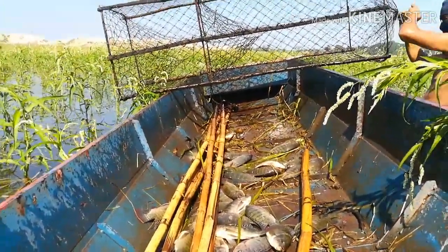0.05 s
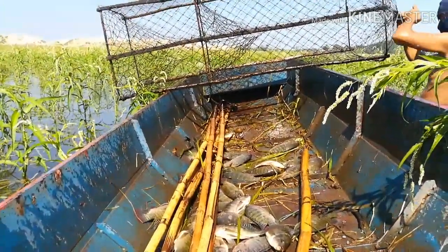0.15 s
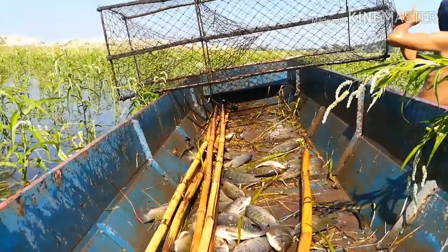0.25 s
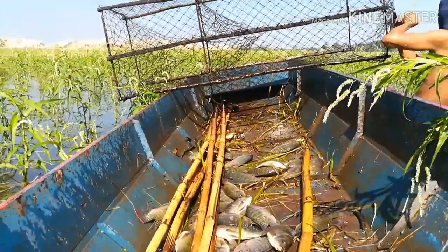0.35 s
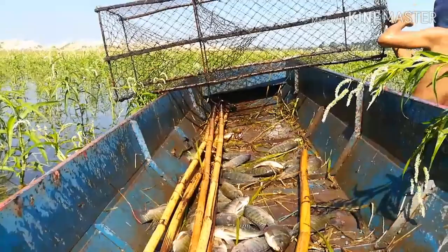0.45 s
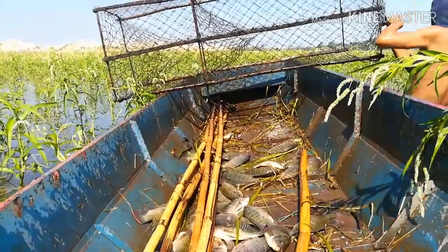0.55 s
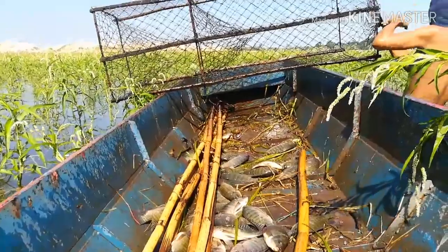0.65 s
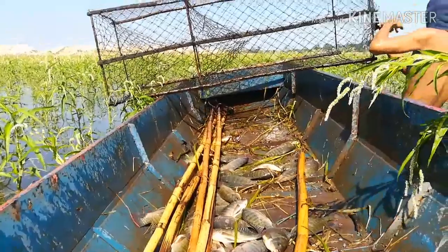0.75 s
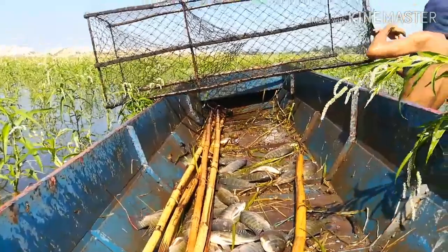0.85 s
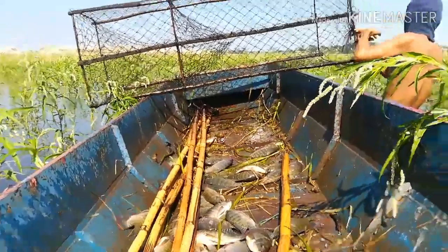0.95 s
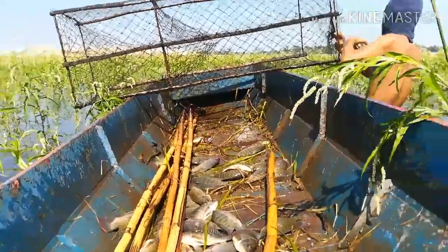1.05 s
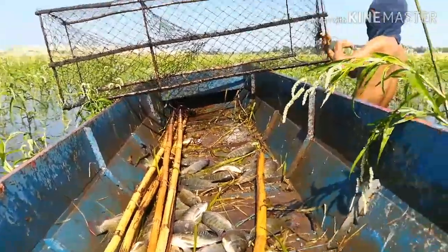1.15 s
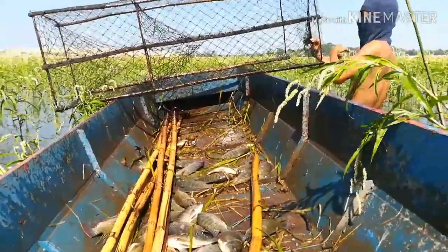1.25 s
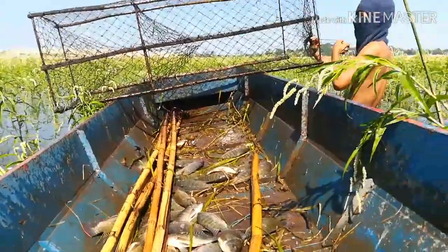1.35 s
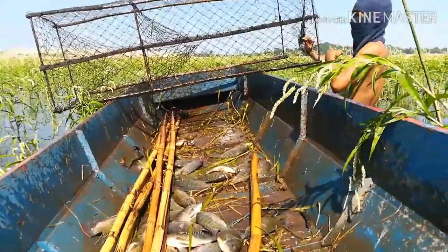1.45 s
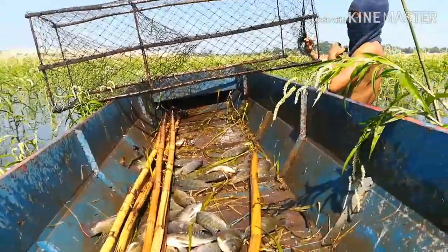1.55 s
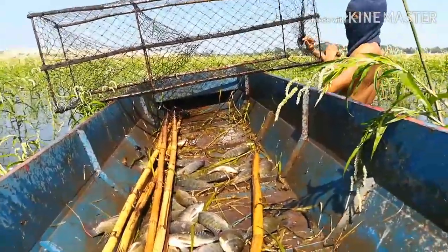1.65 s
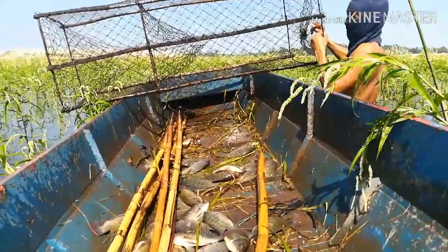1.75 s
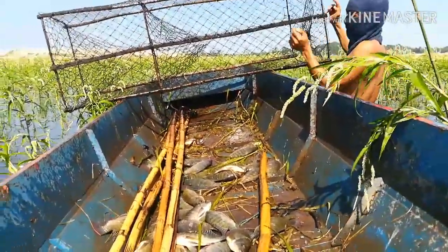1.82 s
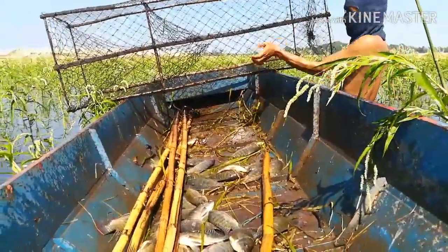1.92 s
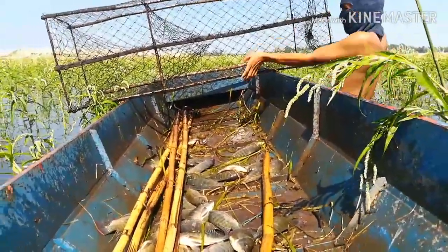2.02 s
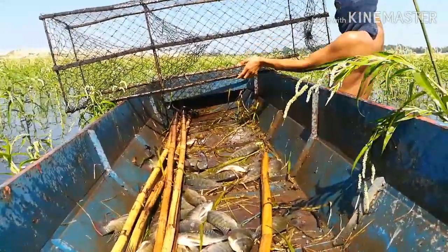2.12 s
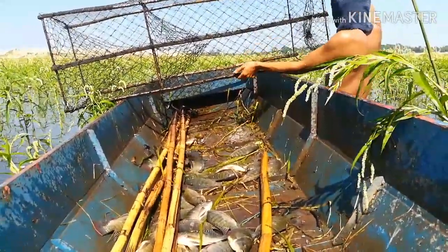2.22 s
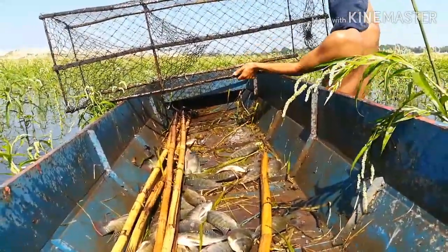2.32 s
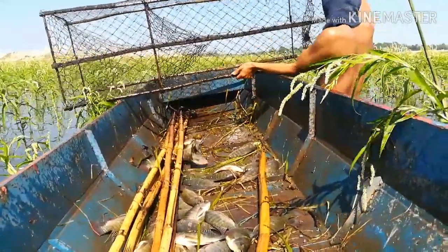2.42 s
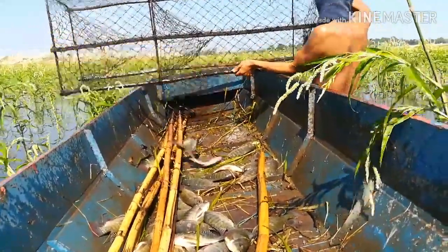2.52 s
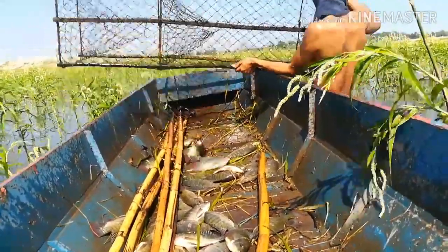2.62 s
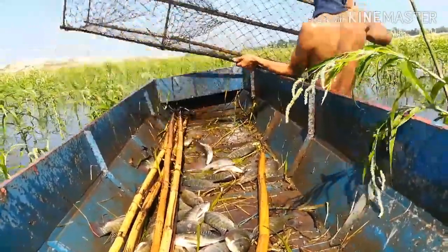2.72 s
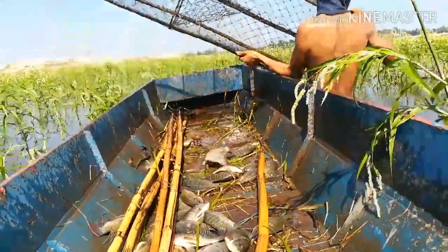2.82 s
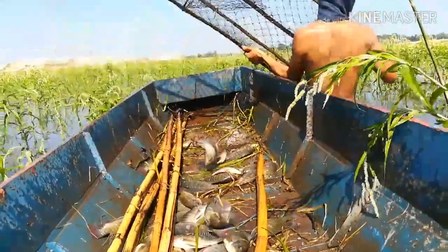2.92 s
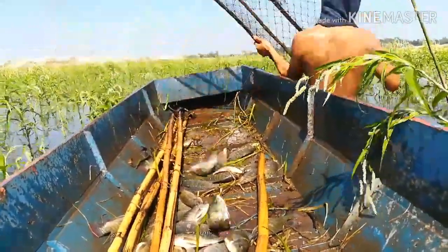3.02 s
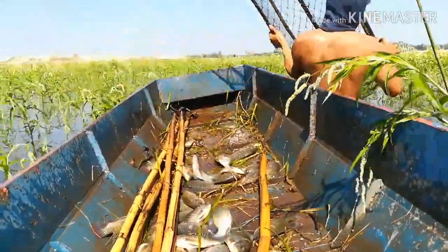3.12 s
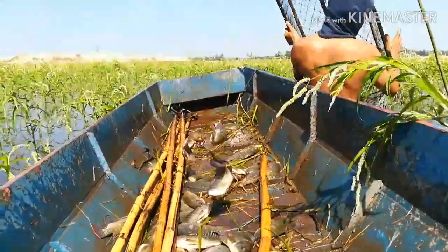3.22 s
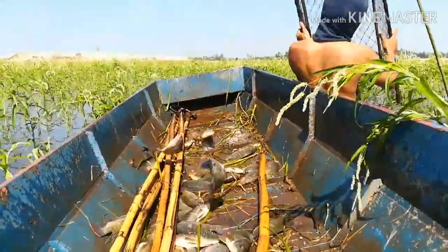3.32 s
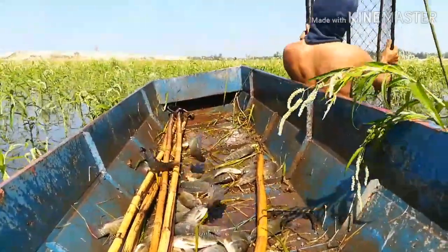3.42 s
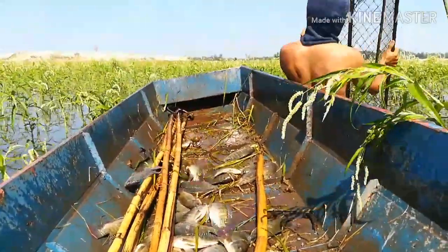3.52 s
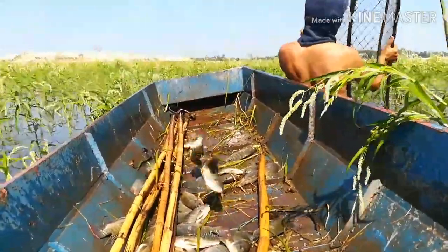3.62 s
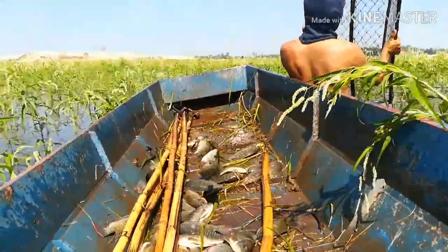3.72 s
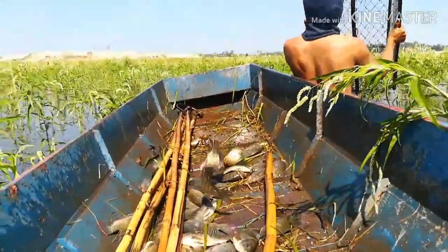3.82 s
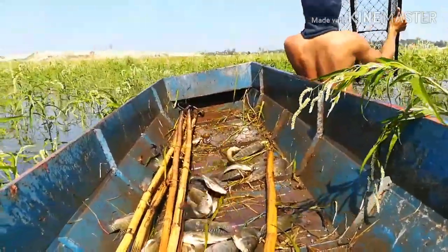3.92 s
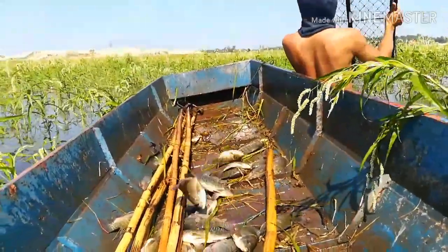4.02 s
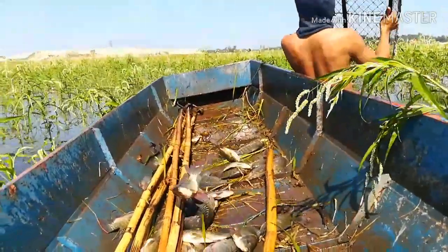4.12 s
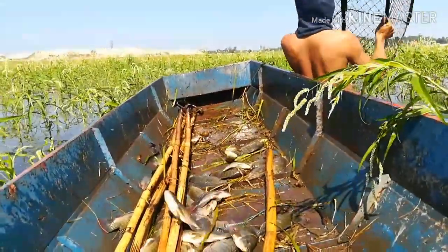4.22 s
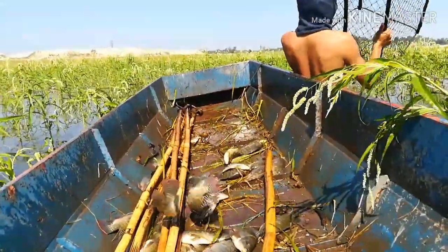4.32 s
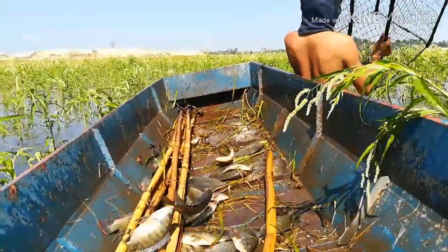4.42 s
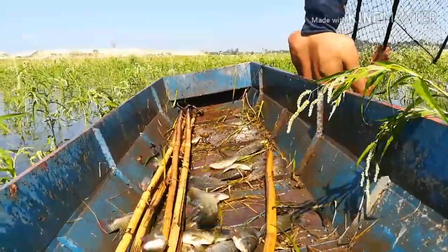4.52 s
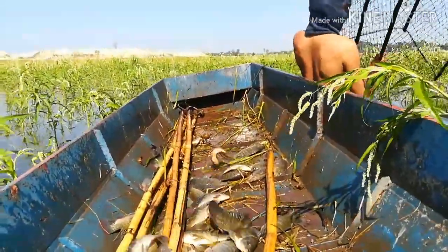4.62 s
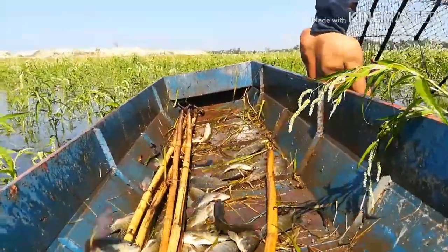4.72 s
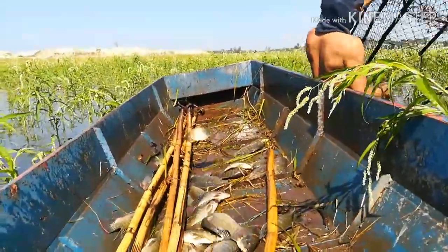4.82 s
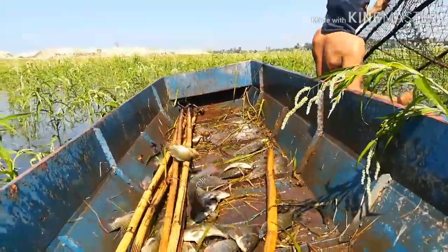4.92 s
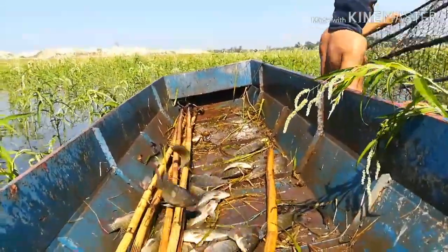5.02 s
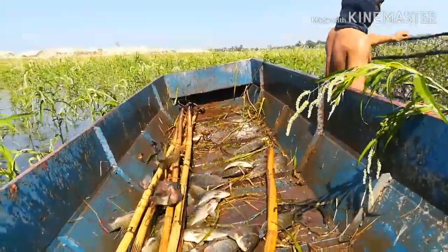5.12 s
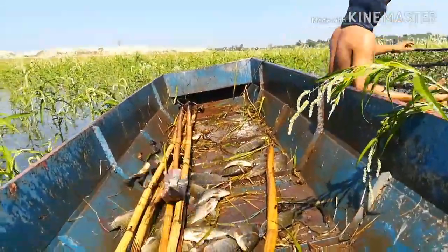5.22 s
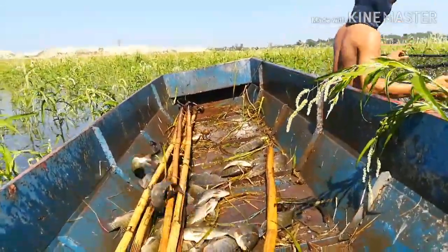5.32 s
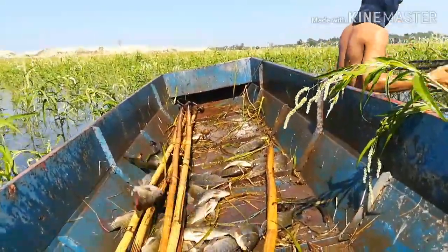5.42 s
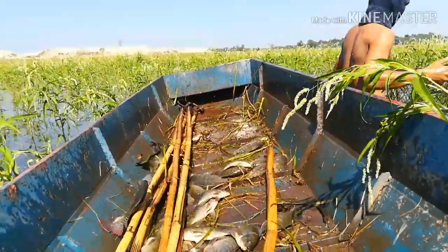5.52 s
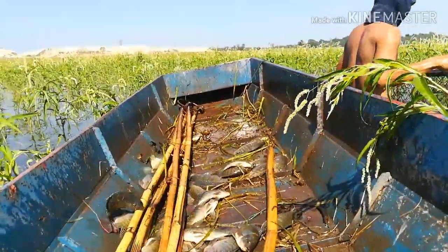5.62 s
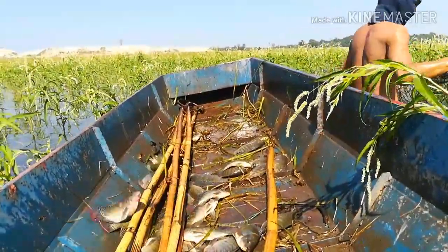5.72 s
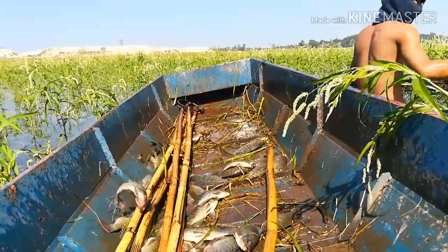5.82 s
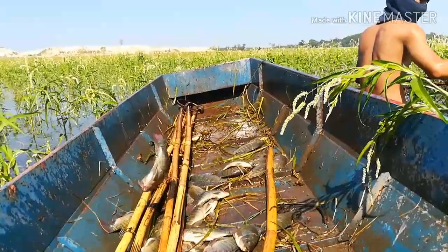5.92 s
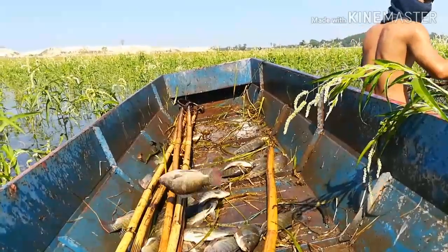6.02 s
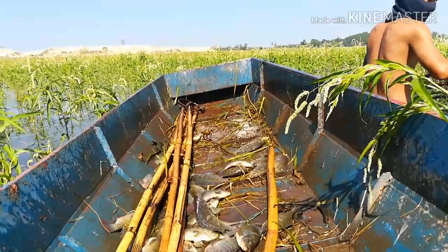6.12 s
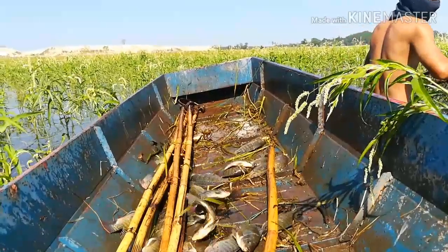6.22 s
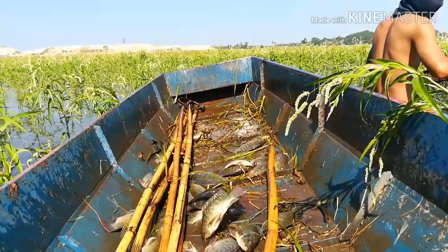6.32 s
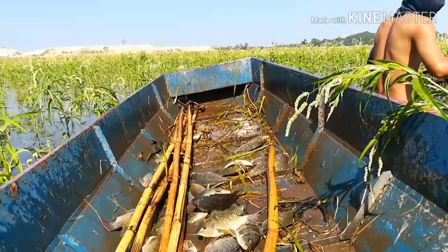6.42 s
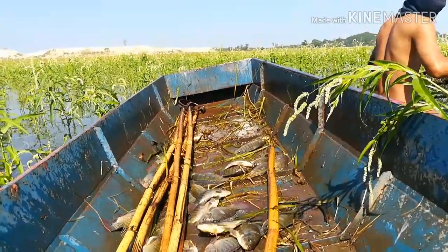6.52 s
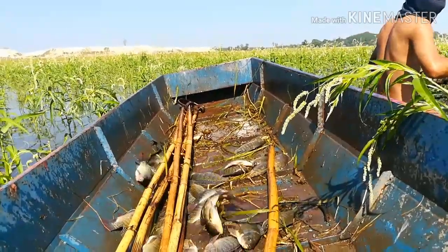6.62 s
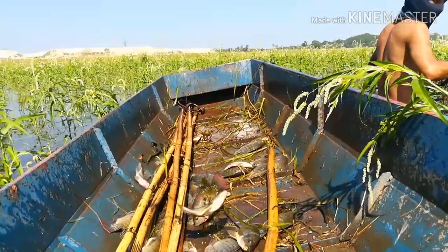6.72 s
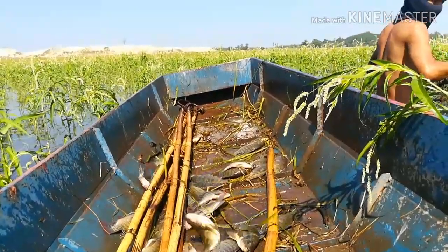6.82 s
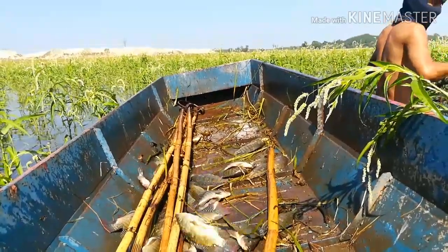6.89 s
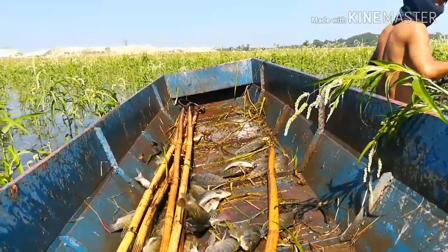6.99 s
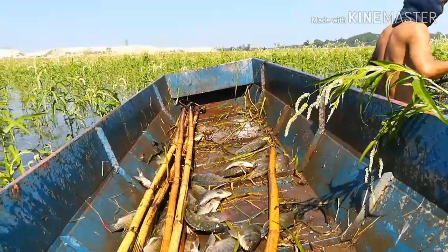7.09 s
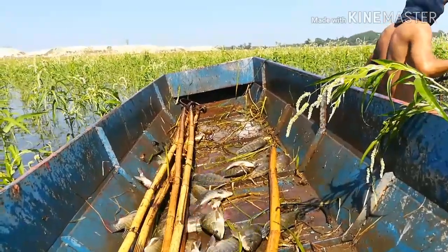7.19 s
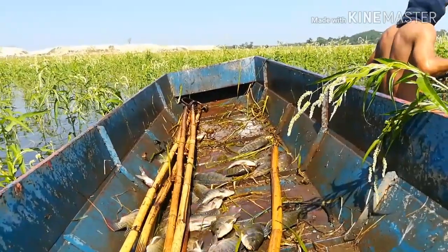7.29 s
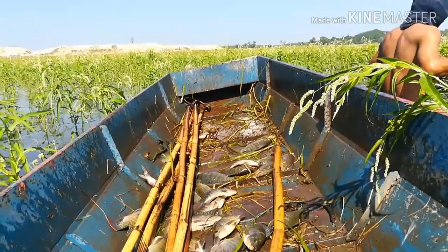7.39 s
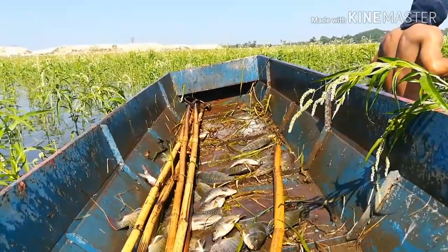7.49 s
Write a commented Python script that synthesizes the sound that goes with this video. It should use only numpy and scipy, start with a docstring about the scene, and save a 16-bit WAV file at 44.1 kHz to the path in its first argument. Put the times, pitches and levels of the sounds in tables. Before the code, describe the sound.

Quiet netting scrapes and a low hull growl give way to irregular wet flopping, hollow metal thuds, clatter, droplets and one sharp crack.

```python
"""On the wet floor of a steel boat in a reed marsh, live fish flop while a wire trap goes over the bow into water.
Slaps, smacks, ticks and rustle are shaped noise with abruptly varying strength or short fades.
Thuds, bamboo poles, wire and the frame's plunge excite decaying modes; drips and spatter are decaying sines.
The boat growls and rumbles as it is shaken, over still open air; steel walls add short echoes to many sounds."""
import sys
import numpy as np
from scipy import signal
from scipy.fft import rfft, irfft, next_fast_len
from scipy.io import wavfile
from scipy.ndimage import uniform_filter1d

SR = 44100
rng = np.random.default_rng(int(sys.argv[2]) if len(sys.argv) > 2 else 0)


def generate_wav(signal):
    """Clip the signal to [-1, 1] and save it as 16-bit WAV at the path in sys.argv[1]."""
    frames = np.transpose(np.atleast_2d(signal))
    scaled = np.clip(frames, -1, 1) * 32767
    pcm = np.round(scaled).astype(np.int16)
    wavfile.write(sys.argv[1], SR, pcm)


N = 332955
TIME = np.arange(N) / SR

# Event levels are those at the source, ahead of any gain, floor colour, wall echo or port colour.
# Wet tail slaps: start_s, level_db, centre_hz, decay_ms (at least 1 ms is used)
SLAPS = [(0.37, -65, 2850, 2.1), (0.529, -60.5, 4970, 23), (2.118, -53.5, 3180, 4),
         (2.343, -48.5, 4430, 7.1), (2.357, -43.5, 2120, 27), (2.386, -48, 4500, 8),
         (2.438, -41, 3870, 3.3), (2.484, -52, 7500, 4), (2.516, -49, 6700, 6.8), (2.545, -35.5, 4020, 3.1),
         (2.667, -42, 3800, 5), (2.848, -46, 2100, 18), (3.036, -39.5, 5040, 4.2), (3.068, -36.5, 4800, 14),
         (3.1, -31, 4000, 8.6), (3.13, -38.5, 5030, 10), (3.222, -37.5, 5570, 8.6), (3.383, -40, 12000, 35),
         (3.865, -38.5, 3180, 23), (3.921, -40.5, 5000, 5), (3.94, -37.5, 5000, 4),
         (4.133, -46.5, 5100, 4.3), (4.184, -45.5, 4630, 6.1), (4.245, -30, 3800, 5.5),
         (4.254, -31.5, 3770, 7), (4.275, -29.5, 3600, 7.1), (4.433, -40.5, 3830, 2),
         (4.462, -34, 5500, 2.2), (4.552, -33.5, 3880, 24.4), (4.8, -33, 6000, 1.6),
         (4.841, -34.5, 3900, 0.82), (4.867, -32.5, 3030, 15), (4.948, -33.5, 3330, 6.8),
         (5.027, -31, 5300, 29), (5.158, -32, 3900, 32), (5.515, -40.5, 3720, 41), (5.726, -41.5, 3640, 15),
         (6.112, -35, 3850, 2.6), (6.172, -39, 5670, 2.4), (6.183, -42, 5640, 2.9), (6.535, -30, 4240, 3.9),
         (6.613, -43, 3350, 5), (6.78, -45.5, 3300, 0.9), (6.809, -28.5, 5500, 8.1),
         (6.862, -30, 2540, 12.7), (6.911, -38, 2520, 13), (6.986, -37, 3240, 12), (7.136, -48, 2550, 5.3),
         (7.158, -46, 2600, 3.2)]
# Whole flanks smacking down flat: start_s, level_db, ring_pitch_ratio
SMACKS = [(3.448, -26, 0.95), (3.49, -26, 0.74), (3.544, -28.5, 1.02)]
# Air gap under a flank, before the pitch ratio: pitch_hz, level_db, t60_s
SMACK_MODES = [(1370, -6, .014), (5020, 3, .008), (6380, 4, 0.01), (7200, 7, .008)]
# Spectrum of a flat smack: frequency_hz, level_db
SMACK_COLOUR = [(700, -21), (1200, -5), (2300, -3), (3800, -2.5), (6000, 2), (9500, 2.5), (11000, 1.5),
                (15500, -8)]
# Wet floor's colour on slaps and clatter: frequency_hz, level_db
FLOOR_COLOUR = [(650, 2), (1300, 1), (1750, 1.5), (2450, -2), (3800, 0.5), (6000, -1), (12000, -2)]
# Lone flicks of a fin: start_s, peak_db, centre_hz
TICKS = [(3.995, -33.5, 3930), (4.368, -37, 5500), (4.409, -33, 5500), (5.96, -46, 11940),
         (6.0, -48.5, 12900), (6.044, -44.5, 11940), (6.472, -32.5, 5840), (6.743, -35, 5200),
         (7.046, -24.5, 4500)]
# Flops that throw up water: start_s, droplet_level_db
SPATTERS = [(2.39, -44), (4.271, -25), (4.95, -34), (5.17, -30), (5.31, -33.5), (5.76, -39.5),
            (6.871, -24.5), (6.995, -32)]
# Bouts of wriggling that stir netting, stalks and wet scales: start_s, length_s, level_db
WRIGGLES = [(2.37, 0.33, -60.5), (3.01, 0.13, -49.5), (3.437, 0.16, -48.5), (3.87, 0.092, -47),
            (4.05, 0.22, -57), (4.43, 0.16, -47), (5.73, 0.071, -51), (6.095, 0.1, -49.5),
            (6.47, 0.06, -58), (6.55, 0.071, -45), (6.85, 0.26, -58), (7.14, 0.18, -62)]
WRIGGLE_ATTACK_S, WRIGGLE_RELEASE_S = 0.0069, 0.014
# Low, lasting stir of the disturbed catch: start_s, length_s, level_db
FIDGET = [(2.08, 5.22, -68.5)]
# Spectrum of netting and wet stalks: frequency_hz, level_db
RUSTLE_COLOUR = [(500, -7.5), (900, 0), (1300, 2), (1950, -3.5), (2600, -2), (3600, -4.5), (5200, -1.5),
                 (7200, -8.5), (11000, -11), (15000, -14)]
# Blows on the hull, soft bodies being dull: start_s, level_db, brightest_ring_hz
THUDS = [(0.529, -50.5, 609), (1.02, -49, 495), (2.089, -56, 257.3), (2.356, -40.5, 319.5),
         (2.384, -33, 279.4), (2.842, -52.5, 259), (3.101, -28, 500), (3.193, -36.5, 250),
         (3.447, -31, 328.6), (3.49, -35, 336), (3.615, -43, 200), (3.919, -40, 241), (4.219, -32, 418),
         (4.26, -33.5, 741), (4.39, -47, 215), (4.56, -37, 285), (4.805, -26.5, 390), (4.89, -34, 424),
         (5.149, -39.5, 591), (5.269, -39.5, 297), (5.59, -42.5, 355), (5.746, -38.5, 458),
         (6.113, -44.5, 229), (6.177, -41.5, 226), (6.54, -35.5, 258), (6.611, -40, 244.6),
         (6.863, -34.5, 522), (6.987, -33.5, 627), (7.148, -42.5, 354)]
# The steel hull's clearest modes: pitch_hz, level_db, t60_s
HULL_MODES = [(60, -8.5, 4), (87.9, 1.5, 1.9), (140, 3, 1.2), (166.3, -2, 1.7), (178.9, 2.5, 0.65),
              (213.8, 0.5, 1), (226.4, 2.5, 0.8), (295, -11.5, 0.34), (367.2, -4, .7), (546, -4.5, .3),
              (661, -7.5, 0.57), (852, -5.5, 0.7), (912, -6.5, 0.46)]
# The hull's crowd of weaker modes: frequency_hz, level_db (per half octave), t60_s
HULL_WASH = [(39.54, -23, 1.3), (59.4, -17.5, 1.6), (101.3, -2, 1.3), (163, -0.5, 1.2), (252, 2, 0.84),
             (310, -2, 0.62), (480, -2, 0.64), (1001, 7.5, 0.26), (2405, -6.5, .25)]
# Poles and bodies clattering on the floor plates: start_s, level_db, decay_ms (at least 1 ms is used)
CLATTERS = [(.875, -53, 19), (2.39, -46.5, 57), (2.668, -44.5, 5.8), (3.102, -39.5, 18), (3.214, -47, 9.7),
            (3.492, -32, 6), (3.51, -47.5, 55), (3.861, -47, 18), (4.248, -31, 14), (4.278, -31.5, 32.3),
            (4.461, -47, 57), (4.553, -47, 46), (4.885, -36.5, 31), (4.939, -36, 17), (5.311, -33.5, 5),
            (5.589, -39.5, 17), (5.74, -44.5, 26), (5.795, -50.5, 51), (6.233, -49.5, 5.7),
            (6.275, -59.5, 19), (6.537, -43, 13), (6.78, -40, 6), (6.86, -37.5, 20), (6.91, -41.5, 52),
            (6.984, -30, 18), (7.03, -40, 26), (7.158, -44.5, 22)]
CLATTER_HZ, CLATTER_DULLING = 1460, 0.12  # centre of a 10 ms clatter; octaves lower per doubled length
# Bamboo on steel: pitch_hz, level_db, t60_s
POLE_MODES = [(628, 10, 0.048), (925, 8.5, 0.041), (1093, 5, 0.01), (1547, -4.5, 0.042), (1663, -1.5, 0.03)]
# One hard crack close by and its rebound: start_s, level_db
CRACKS = [(4.2151, -7.5), (4.221, -22.5)]
# Spectrum of the crack: frequency_hz, level_db
CRACK_COLOUR = [(800, -37), (1130, -7), (1400, -18), (2400, -13.5), (3650, -1), (5500, 2), (6600, -17),
                (9200, -16), (15000, -21.5)]
# Pulls that drag the trap's frame over the bow and down the side: start_s, length_s, level_db
PULLS = [(.295, 0.088, -49), (.53, 0.49, -46), (1.03, 0.079, -43), (1.15, 0.14, -50), (2.7, 0.45, -48),
         (3.66, 0.62, -48)]
PULL_ATTACK_S, PULL_RELEASE_S = 0.02, 0.062
# Spectrum of the dragging growl: frequency_hz, level_db
DRAG_COLOUR = [(40, -4), (90, -3), (180, 2.5), (280, -1.5), (400, -12.5), (620, -18.5), (1100, -24),
               (2100, -34), (3000, -38.5), (6000, -47.5)]
# Knots that slip as the trap's netting stretches: start_s, level_db, decay_ms (at least 1 ms is used)
SLIPS = [(.853, -48, 5.1), (.878, -54, 14), (.894, -48.5, 6.9), (.915, -47, 5), (.926, -47, 4),
         (.957, -38.5, 7.4), (.984, -40, 3.4), (1.025, -49, 21), (1.055, -41, 7.7), (1.084, -55, 8),
         (1.157, -50.5, 6), (1.171, -51.5, 5.6), (1.234, -58, 14), (1.262, -58, 18)]
# Netting wire, before each slip's random tension: pitch_hz, level_db, t60_s
WIRE_MODES = [(2036, 2.5, 0.025), (5220, 3, 0.014)]
# Spectrum of a slipping knot: frequency_hz, level_db
NET_COLOUR = [(700, -15), (1300, 0.5), (2000, -4.5), (3200, 0), (5400, 2), (9500, 0), (15000, -8.5)]
BUMP_S, BUMP_DB, BUMP_LENGTH_S = 1.745, -54, 0.042  # the trap's frame rubs briefly on the bow
# The rubbed frame: pitch_hz, level_db, t60_s
BUMP_MODES = [(240, 3, 0.17), (261, -2, 0.24), (326, -12, 0.86), (980, -15, 0.17)]
ENTRY_S, PLUNGE_S, ENTRY_ATTACK_S = 4.86, 5.16, 0.022  # mesh meets water, then the frame plunges under
MESH_DB, MESH_FALL_DB_PER_S = -34.5, 51  # the netting's rustle dies away as it sinks
SPLASH_DB, SPLASH_RISE_DB_PER_S, SPLASH_FALL_DB_PER_S = -33.5, 67, 45
# Spectrum of the droplet fizz: frequency_hz, level_db
SPLASH_COLOUR = [(210, -22), (350, -6), (639, -13.5), (951, -6), (1150, -11), (1440, -9), (2040, -19.5),
                 (2420, -15.5), (5800, -18), (15500, -29)]
GULP_DB, GULP_LAG_S, GULP_WIDTH_S = -29.5, 0.0055, 0.011
# Hollow gulp of the plunge: pitch_hz, level_db, t60_s
GULP_MODES = [(550, 2.5, 0.082), (764, 5.5, 0.029), (886, -3, 0.12), (940, -2.5, 0.07), (1272, -7.5, 0.14),
              (1481, -1, 0.066), (2406, -6, 0.087)]
# Single drips and popping air pockets: start_s, peak_db, starting_pitch_hz
DRIPS = [(1.5688, -49, 1430), (2.007, -64, 1350), (2.404, -41, 1640), (2.463, -45, 1700),
         (2.507, -46, 1630), (2.668, -40, 1640), (3.491, -30.5, 1145), (4.269, -23, 1870),
         (5.842, -43.5, 1700), (5.883, -48, 1710), (6.202, -46, 1490), (6.234, -42, 1180),
         (6.279, -55, 1100), (6.297, -55, 1700), (6.86, -22, 1530), (6.989, -24, 1310),
         (7.292, -40.5, 2640)]
ROCK_DB, ROCK_POWER, ROCK_SMOOTH_S = -54, 0.75, 0.32  # rumble level, its growth with shaking, averaging time
# Spectrum of the open air: frequency_hz, level_db
AIR_COLOUR = [(12, -35.5), (20, -5), (44, -6.5), (146, -10), (678, -28.5), (1220, -28.5), (2020, -33),
              (16000, -37.5)]
AIR_DB = -67.5
# Unequal treble of the two microphone ports: frequency_hz, left_minus_right_db
PORTS = [(200, 0), (700, 3.5), (2000, 2.5), (3000, 5.5), (5500, 6.5), (7500, -1), (10000, -6), (15000, -10)]
TOP_HZ = 15900


def slaps(spread_db=3, width=1.84, ripple_db=3.5, rise_s=0.00072,
          swish_db=-18, swish_s=0.01, spray_db=-23, spray_s=0.013):
    """Broadband impact: a wet tail swishes down, peels on to the floor in tiny clicks and leaves a little spray."""
    out, lead = np.zeros((2, N)), SR // 50  # room for the swish before contact
    t = TIME[:SR // 8] - lead / SR
    after = np.maximum(t, 0)
    for s, db, centre_hz, decay_ms in SLAPS:
        colouring = lambda hz: hump(hz, centre_hz, width) / np.hypot(1, (900 / hz) ** 2)
        burst = shape(grains(len(t), spread_db), colouring)
        peel = np.exp(-after * 1e3 / max(decay_ms, 1))
        spray = undb(spray_db) * np.exp(-after / spray_s)
        contact = (peel + spray) * (1 - np.exp(-after / rise_s))
        swish = undb(swish_db) * np.exp(-abs(t) / swish_s)
        slap = uneven(burst, ripple_db) * (contact + swish)
        add(out, s - lead / SR, slap * undb(db) / slap[:, lead:lead + SR // 80].std())
    return between_walls(out, wet_db=-21.0, t60=0.44)


def smacks(spread_db=2, rise_s=0.0006, decay_s=0.0043, modes_db=-4):
    """Cavity resonance: a flank lands flat with a dry smack, and the gap closing under it rings hollow."""
    out, t = np.zeros((2, N)), TIME[:SR // 16]
    for s, db, pitch in SMACKS:
        contact = grains(len(t), spread_db) * (1 - np.exp(-t / rise_s)) ** 2 * np.exp(-t / decay_s)
        contact = contact + 0.29 * contact[::-1]  # each port hears some of the other's share
        modes = [(hz * pitch, mode_db, t60) for hz, mode_db, t60 in SMACK_MODES]
        gap = ring(modes, t).real.sum(0)
        hollow = signal.fftconvolve(contact, gap[None], axes=1)[:, :len(t)]
        smack = colour(contact, SMACK_COLOUR) + unit(hollow) * undb(modes_db)
        add(out, s, smack * undb(db) / smack[:, :SR // 100].std())
    return between_walls(out, wet_db=-17, t60=0.23)


def ticks(width=0.7, decay_s=0.001):
    """Impulsive contact: fins flick the wet floor in lone, tiny, band-limited clicks."""
    out, t = np.zeros((2, N)), TIME[:SR // 50]
    for s, db, centre_hz in TICKS:
        noise = shape(rng.standard_normal((2, len(t))), lambda hz: hump(hz, centre_hz, width))
        click = noise * np.exp(-t / decay_s)
        add(out, s, click / abs(click).max() * undb(db))
    return between_walls(out, wet_db=-8, t60=0.15)


def spatter(gain_db=-3, spread_db=4, centre_hz=2300, octaves=0.8, cycles=17, fall_s=0.04, pan_db=5, count=14):
    """Damped oscillation: water thrown up by a flop falls back as separate ringing droplets, the late ones weaker."""
    out, t = np.zeros((2, N)), TIME[:SR // 25]
    for s, db in SPATTERS:
        delays = rng.exponential(size=count)
        traits = np.clip(rng.standard_normal((count, 3)), -1.5, 1.5)
        for late, (size, pitch, side) in zip(delays, traits):
            hz = centre_hz * 2 ** (octaves * pitch)
            drop = ring([(hz, db + gain_db + spread_db * size, cycles / hz)], t).imag[0]
            add(out, s + late * fall_s, drop * np.exp(-late / 2), pan_db * side)
    return between_walls(out, wet_db=-7.5, t60=0.1)


def rustle(spread_db=2.5, flutter_db=5.5, flutter_rate=70):
    """Frictional crackle: wriggling fish and sinking mesh stir netting and stalks in uneven little bursts."""
    fish = bouts(WRIGGLES + FIDGET, WRIGGLE_ATTACK_S, WRIGGLE_RELEASE_S)
    mesh = in_water() * undb(MESH_DB - MESH_FALL_DB_PER_S * np.maximum(TIME - ENTRY_S, 0))
    # a new random strength about every 14 ms, joined by straight lines
    catches = np.interp(TIME * flutter_rate, np.arange(1024), rng.standard_normal(1024))
    crackle = colour(grains(N, spread_db, hold=40) * undb(flutter_db * catches), RUSTLE_COLOUR)
    return between_walls(crackle * (fish + mesh), wet_db=-10.0, t60=0.13)


def hull(modes_db=1, rise_s=0.0059, stiff_s=0.042, stiff=0.59):
    """Modal excitation: each blow wakes the hull's modes in a new mix; the longer the contact, the duller the boom."""
    out, t = np.zeros((2, N)), TIME[:SR * 6 // 5]
    centres = 40 * 2 ** (np.arange(13) / 2)  # half-octave bands, Hz
    field = ports(rng.standard_normal((2, N + len(t))))
    bands = np.array([unit(shape(field, lambda hz: np.exp(-(np.log2(hz / c) / .33) ** 2))) for c in centres])
    fades = np.exp(-np.log(1000) * t / at_hz(centres, HULL_WASH, axis=2)[:, None])
    modes, mode_hz = ring(HULL_MODES, t), np.transpose(HULL_MODES)[0]
    # the struck plate moves most until the blow has spread through the boat
    attack = (1 - np.exp(-t / rise_s)) * (1 + stiff * np.exp(-t / stiff_s))
    places = rng.random((len(THUDS), len(HULL_MODES)))
    for (s, db, top_hz), place in zip(THUDS, places):
        i = int(s * SR)
        # a short, hard contact also pushes the deepest modes less
        contact = lambda hz: 1 / np.hypot(1, (hz / top_hz) ** 3) / np.hypot(1, top_hz * 0.32 / hz)
        weights = undb(at_hz(centres, HULL_WASH)) * contact(centres)
        wash = np.einsum("bcn,bn->cn", bands[:, :, i:i + len(t)], weights[:, None] * fades)
        phases = np.exp(2j * np.pi * place)
        tones = (phases * contact(mode_hz) @ modes).imag
        boom = (unit(wash) + undb(modes_db) * unit(tones)) * attack
        add(out, s, boom * undb(db) / boom[:, :SR // 15].std())
    return out


def clatter(gain_db=3, spread_db=4, width=1.17, modes_db=-5, ripple_db=3, rise_s=0.0026):
    """Repeated impact: chattering contacts ring bamboo poles and floor plates; long clatters are duller."""
    out, t = np.zeros((2, N)), TIME[:SR // 4]
    for s, db, decay_ms in CLATTERS:
        decay_ms = max(decay_ms, 1)
        centre_hz = CLATTER_HZ * (10 / decay_ms) ** CLATTER_DULLING
        contacts = shape(grains(len(t), spread_db, hold=96), lambda hz: hump(hz, centre_hz, width))
        fade = np.exp(-t * 1e3 / decay_ms) * (1 - np.exp(-t / rise_s))
        rattle = unit(uneven(contacts, ripple_db, step_hz=152.0) * fade)
        add(out, s, rattle * np.sqrt(np.mean(fade ** 2)) * undb(db + gain_db))
    out = out + 0.15 * out[::-1]  # part of each contact reaches both ports alike
    poles = signal.fftconvolve(out, ring(POLE_MODES, t).real.sum(0)[None], axes=1)[:, :N]
    return between_walls(out + unit(poles) * out.std() * undb(modes_db), wet_db=-9.5, t60=0.42)


def crack(pan_db=2, length_s=0.003, tail_db=-17, tail_s=0.0051, unlike=0.48):
    """Hard impact and rebound: a gritty contact crunches for about 3 ms, too light to carry much bass."""
    out, t = np.zeros((2, N)), TIME[:SR // 20]
    fade = np.exp(-(t / length_s) ** 4) + undb(tail_db) * np.exp(-t / tail_s)
    onset = 1 - np.exp(-t * SR / 10)  # ten samples
    for s, db in CRACKS:
        grit = colour(rng.standard_normal((2, len(t))), CRACK_COLOUR)
        pair = grit[0] + unlike * np.array([[1], [-1]]) * grit[1]
        snap = pair * fade * onset
        add(out, s, snap * undb(db) / snap[:, :SR // 400].std(), pan_db)
    return between_walls(out, wet_db=-19, t60=0.11)


def drag(gain_db=-1, spread_db=2.5):
    """Stick-slip friction: with each pull the frame catches and slips on the rim, and the hull growls."""
    growl = colour(ports(grains(N, spread_db, hold=128)), DRAG_COLOUR)
    return growl * bouts(PULLS, PULL_ATTACK_S, PULL_RELEASE_S) * undb(gain_db)


def net(spread_db=3, ripple_db=4, modes_db=-3, rise_s=0.00088, detune=0.062, linger_db=-15, linger_s=0.031):
    """Stick-slip with resonance: knots slip one by one, each scrape with its own colour ringing the taut wire."""
    out, t = np.zeros((2, N)), TIME[:SR // 8]
    for s, db, decay_ms in SLIPS:
        slip = np.exp(-t * 1e3 / max(decay_ms, 1))
        linger = undb(linger_db) * np.exp(-t / linger_s)
        fade = (slip + linger) * (1 - np.exp(-t / rise_s))
        scrape = uneven(colour(grains(len(t), spread_db, hold=48), NET_COLOUR), ripple_db) * fade
        tension = 1 + detune * rng.uniform(-1.9, 1.9)  # scales pitch and decay rate
        modes = ring(WIRE_MODES, t * tension).real.sum(0)
        wire = signal.fftconvolve(scrape, modes[None], axes=1)[:, :len(t)]
        sound = unit(unit(scrape) + unit(wire) * undb(modes_db))
        add(out, s, sound * np.sqrt(np.mean(fade ** 2)) * undb(db))
    return between_walls(out, wet_db=-8.5, t60=0.12)


def bump():
    """Friction-driven resonance: a brief rub swells and sets the trap's frame humming."""
    out, t = np.zeros((2, N)), TIME[:SR // 2]
    rub = rng.standard_normal(len(t)) * t * np.exp(-2 * t / BUMP_LENGTH_S)
    hum = signal.fftconvolve(rub, ring(BUMP_MODES, t).imag.sum(0))
    add(out, BUMP_S - BUMP_LENGTH_S / 2, hum * undb(BUMP_DB) / hum[:SR // 10].std())
    return out


def splash(spread_db=2.5):
    """Surface break-up: mesh entering the water fizzes with droplets, growing to the plunge, then draining away."""
    rise = SPLASH_RISE_DB_PER_S * np.maximum(PLUNGE_S - TIME, 0)
    fall = SPLASH_FALL_DB_PER_S * np.maximum(TIME - PLUNGE_S, 0)
    fizz = colour(grains(N, spread_db, hold=64), SPLASH_COLOUR)
    return fizz * in_water() * undb(SPLASH_DB - rise - fall)


def gulp():
    """Cavity resonance: water rushes in and closes over the frame with a short, hollow ring."""
    rush = rng.standard_normal((2, N)) * np.exp(-abs(TIME - PLUNGE_S - GULP_LAG_S) / GULP_WIDTH_S)
    cavity = ring(GULP_MODES, TIME[:SR // 3]).imag.sum(0)
    hollow = signal.fftconvolve(rush, cavity[None], axes=1)[:, :N]
    i = int(PLUNGE_S * SR)
    return hollow * undb(GULP_DB) / hollow[:, i:i + SR // 30].std()


def drips(cycles=24, glide=0.054):
    """Bubble resonance: drops and trapped air plink in bilge water, rising in pitch; higher ones die sooner."""
    out, t = np.zeros((2, N)), TIME[:SR // 10]
    for s, db, hz in DRIPS:
        age = t * hz / cycles  # reaches 1 as the plink has fallen by 60 dB
        tone = np.sin(2 * np.pi * hz * t * (1 + glide * np.minimum(age, 1)))
        plink = tone * np.exp(-np.log(1000) * age) * (1 - np.exp(-t * hz))
        add(out, s, plink / plink.max() * undb(db))
    return between_walls(out, wet_db=-8.5, t60=0.12)


def rocking(shaking, centre_hz=35, width=4.5):
    """Forced motion: the boat rumbles low on the water, following the shaking of its hull."""
    effort = np.sqrt(np.abs(uniform_filter1d(shaking[0] ** 2, int(ROCK_SMOOTH_S * SR))))
    rumble = unit(shape(rng.standard_normal(N), lambda hz: hump(hz, centre_hz, width)))
    return rumble * unit(effort ** ROCK_POWER) * undb(ROCK_DB)


def marsh():
    """Ambient noise: still open air is a steady, faint, mostly low hiss and rumble."""
    return colour(ports(rng.standard_normal((2, N))), AIR_COLOUR) * undb(AIR_DB)


def in_water():
    """Exponential approach: rises from 0 towards 1 as the trap meets the water."""
    return 1 - np.exp(-np.maximum(TIME - ENTRY_S, 0) / ENTRY_ATTACK_S)


def bouts(rows, attack_s, release_s):
    """Amplitude envelope: gain of actions that swell, hold for their length and die away."""
    gain = np.zeros(N)
    for s, length_s, db in rows:
        age = np.maximum(TIME - s, 0)
        swell = 1 - np.exp(-age / attack_s)
        gain += undb(db) * swell * np.exp(-np.maximum(age - length_s, 0) / release_s)
    return gain


def between_walls(x, wet_db, t60):
    """Reverberation: the steel sides throw a sound back and forth for a moment."""
    t = TIME[:SR // 2]
    echo = rng.standard_normal((2, len(t))) * np.exp(-np.log(1000) * t / t60) * (1 - np.exp(-t / 0.0056))
    return x + undb(wet_db) * signal.fftconvolve(x, unit(echo) / np.sqrt(len(t)), axes=1)[:, :N]


def ports(pair, split_hz=480, lag_ms=0.5, unlike=0.88):
    """Spatial coherence: two signals become left and lagging right, alike in the bass and unlike in the treble."""
    side = shape(pair[1], lambda hz: unlike * hz ** 3 / (hz ** 3 + split_hz ** 3) + 0.048)
    right = shape(pair[0] - side, lambda hz: np.exp(-2j * np.pi * hz * lag_ms / 1e3))
    return np.array([pair[0] + side, right])


def grains(size, spread_db, hold=16):
    """Granular noise: strength jumps every hold samples, like tiny clicks of very unequal strength at both ports."""
    strength = undb(spread_db * np.minimum(rng.exponential(size=size // hold + 1), 3.8))
    return unit(rng.standard_normal((2, size)) * np.repeat(strength, hold)[:size])


def ring(modes, t):
    """Modal decay: one decaying complex wave for each mode."""
    hz, db, t60 = np.transpose(modes)[:, :, None]
    return undb(db) * np.exp((2j * np.pi * hz - np.log(1000) / t60) * t)


def uneven(x, ripple_db, step_hz=450):
    """Local response: every spot has its own chance peaks and dips."""
    points = np.arange(0, SR / 2, step_hz)
    ripple = rng.standard_normal(256)[:len(points)]
    return shape(x, lambda hz: undb(ripple_db * np.interp(hz, points, ripple)))


def hump(hz, centre_hz, width):
    """Damped resonance: a broad peak with skirts of 12 dB an octave."""
    return 1 / (1 + ((hz / centre_hz - centre_hz / hz) / width) ** 2)


def colour(x, points):
    """Spectral shaping: give x a tabled spectrum, at rms 1."""
    return unit(shape(x, lambda hz: undb(at_hz(hz, points))))


def shape(x, gain):
    """Linear filtering: multiply the spectrum by a gain that is a function of frequency."""
    size = next_fast_len(x.shape[-1], True)
    return irfft(rfft(x, size) * gain(np.fft.rfftfreq(size, 1 / SR) + 1), size)[..., :x.shape[-1]]


def at_hz(hz, points, axis=1):
    """Logarithmic frequency: read a column of a spectrum table by interpolation."""
    table = np.transpose(points)
    return np.interp(np.log(hz + 1e-9), np.log(table[0]), table[axis])


def undb(db):
    """Decibel law: decibels to amplitude gain."""
    return 10 ** (np.asarray(db) / 20)


def unit(x):
    """Effective value: scale to rms 1."""
    return x / np.sqrt(np.mean(x ** 2) + 1e-18)


def add(out, s, sound, pan_db=0):
    """Superposition: mix a sound in at time s, louder on the left by pan_db."""
    i = max(int(s * SR), 0)
    part = sound[..., :N - i]
    out[:, i:i + part.shape[-1]] += part * undb([[pan_db / 2], [-pan_db / 2]])


def scene():
    """Superposition of everything in and around the boat."""
    boat = hull() + drag()
    on_floor = shape(slaps() + clatter(), lambda hz: undb(at_hz(hz, FLOOR_COLOUR)))
    fish = on_floor + smacks() + crack() + spatter() + rustle() + ticks()
    trap = net() + bump() + drips() + splash() + gulp()
    return fish + boat + trap + rocking(boat) + marsh()


def record(dry):
    """Reception: each port colours the treble its own way, peaks beyond full scale clip and the top is cut."""
    tilt = lambda hz: undb(np.array([[1], [-1]]) * at_hz(hz, PORTS) / 2)
    # the mean power of the two ports' gains stays 1 at every frequency
    heard = shape(dry, lambda hz: tilt(hz) / np.sqrt(np.mean(tilt(hz) ** 2, axis=0)))
    top_cut = signal.ellip(8, .2, 70, TOP_HZ, fs=SR, output="sos")
    return signal.sosfilt(top_cut, np.clip(heard, -1, 1))


dry = scene()
out = record(dry)
generate_wav(out)
```